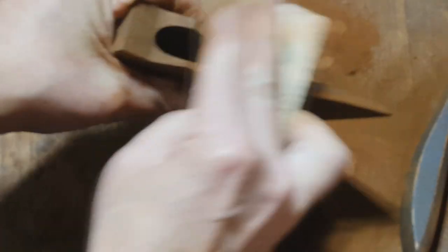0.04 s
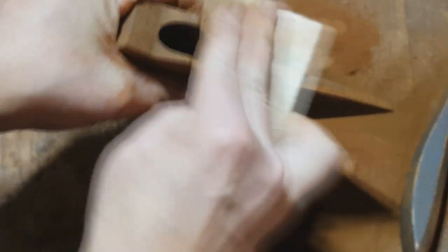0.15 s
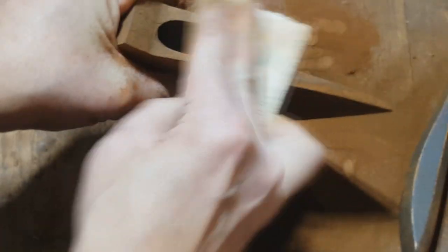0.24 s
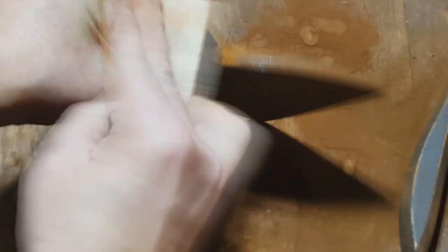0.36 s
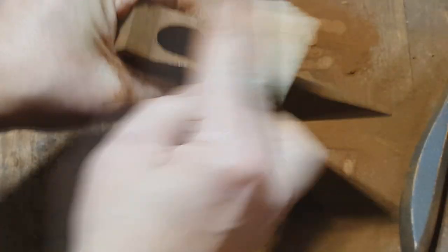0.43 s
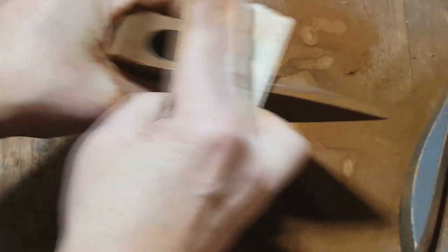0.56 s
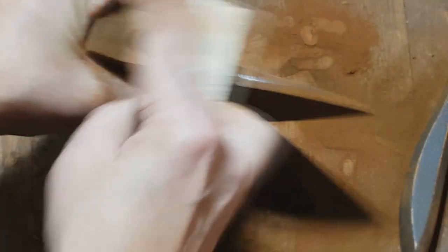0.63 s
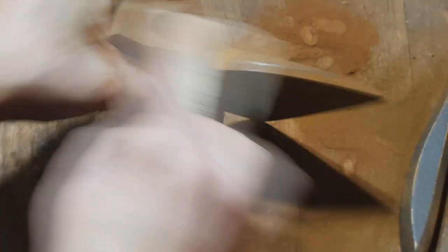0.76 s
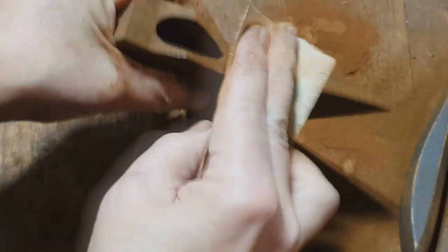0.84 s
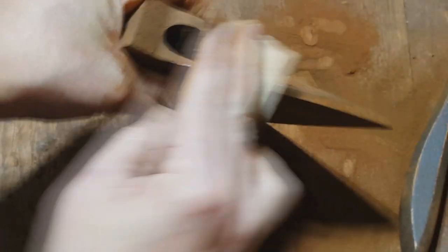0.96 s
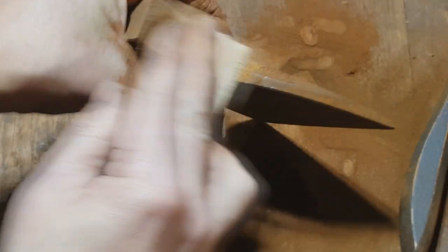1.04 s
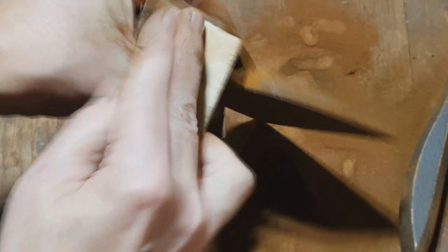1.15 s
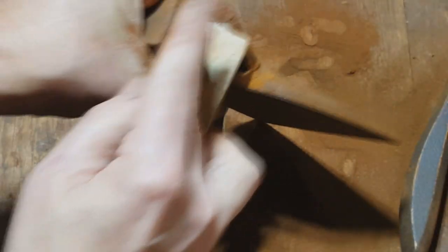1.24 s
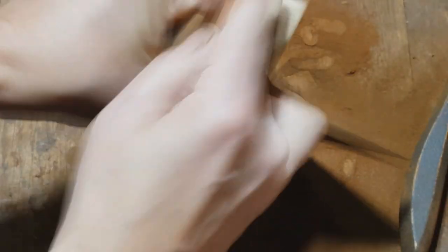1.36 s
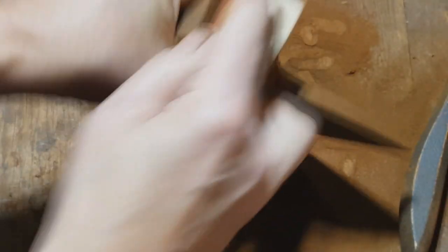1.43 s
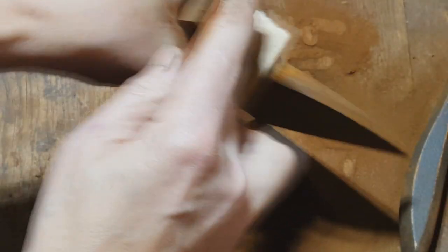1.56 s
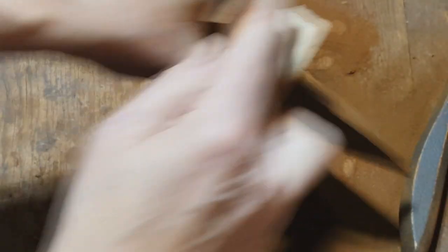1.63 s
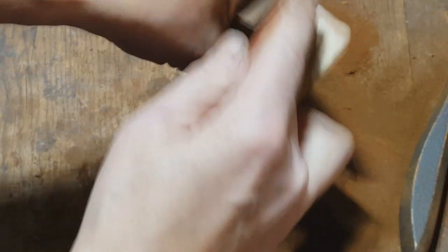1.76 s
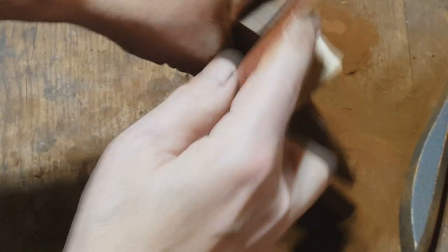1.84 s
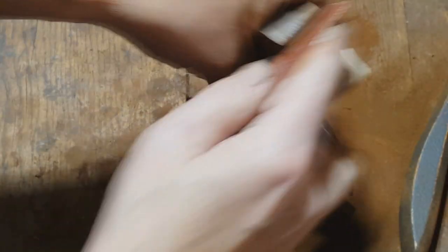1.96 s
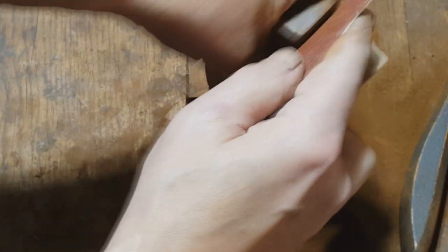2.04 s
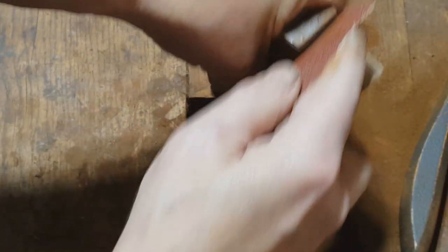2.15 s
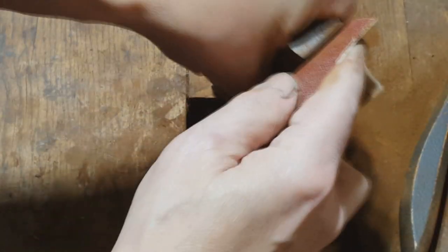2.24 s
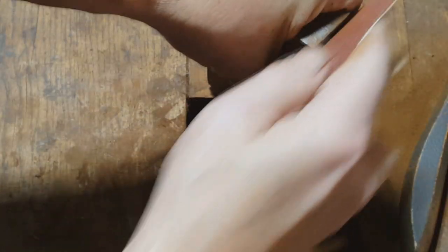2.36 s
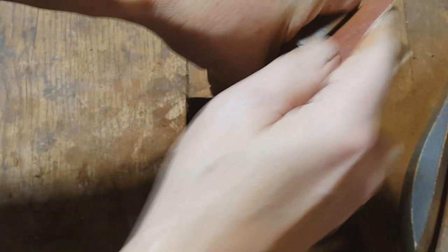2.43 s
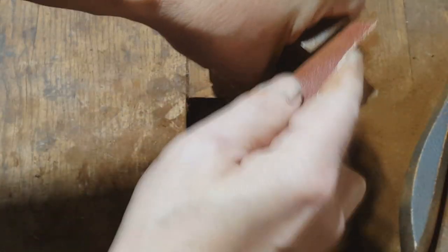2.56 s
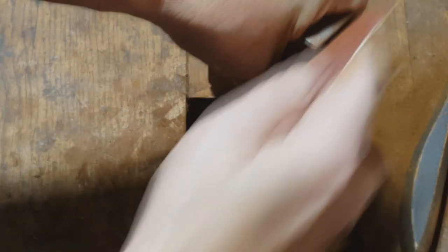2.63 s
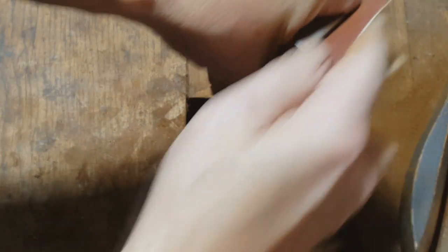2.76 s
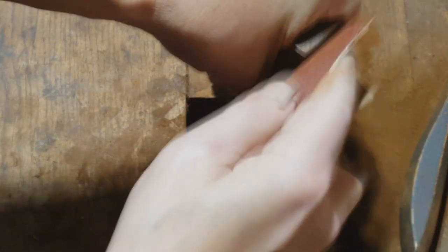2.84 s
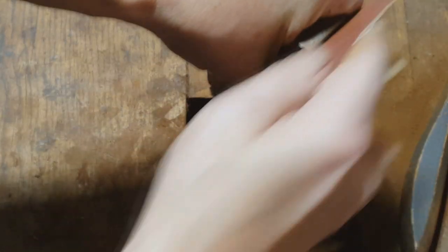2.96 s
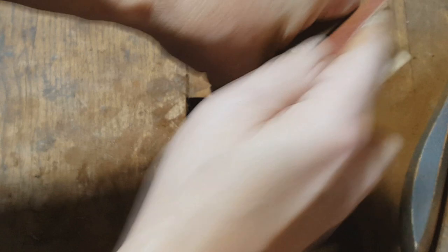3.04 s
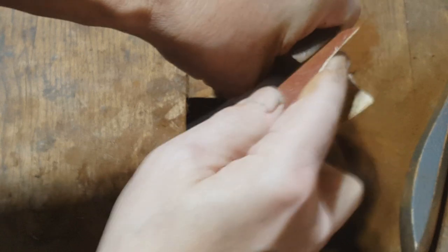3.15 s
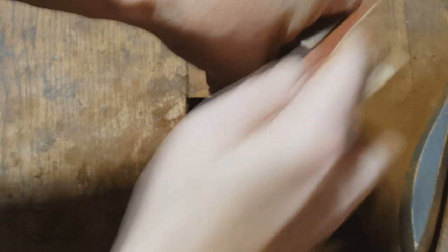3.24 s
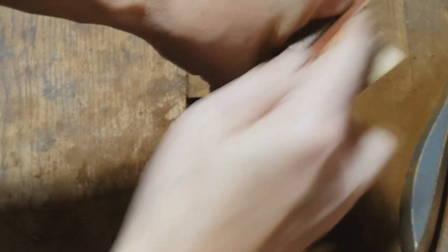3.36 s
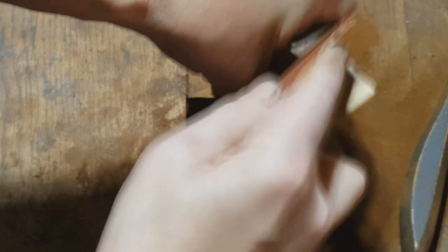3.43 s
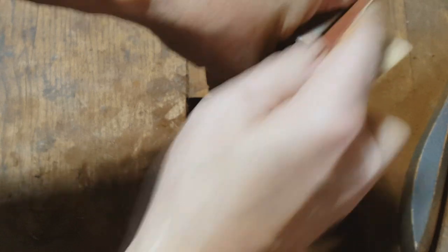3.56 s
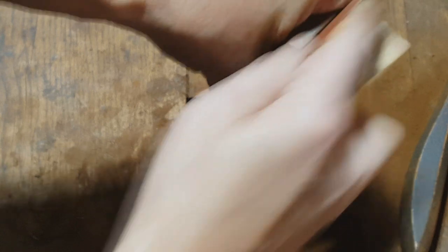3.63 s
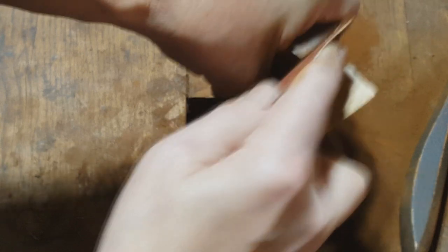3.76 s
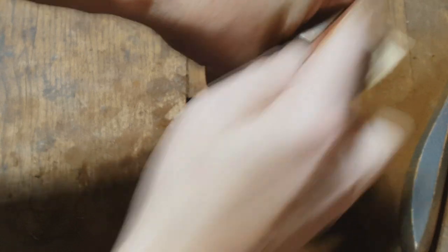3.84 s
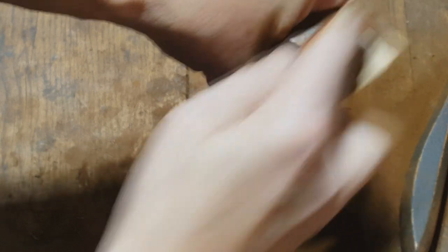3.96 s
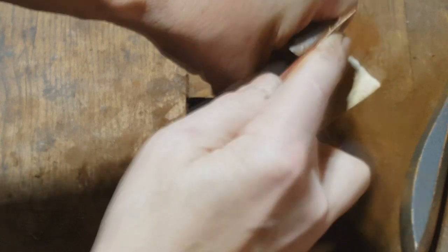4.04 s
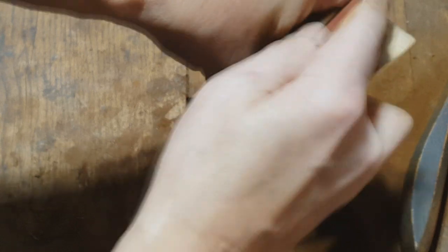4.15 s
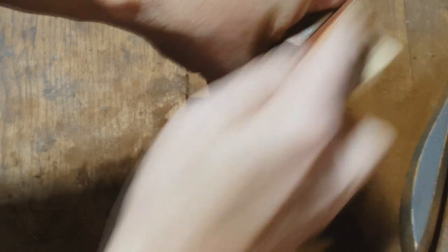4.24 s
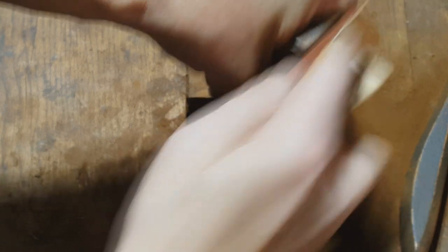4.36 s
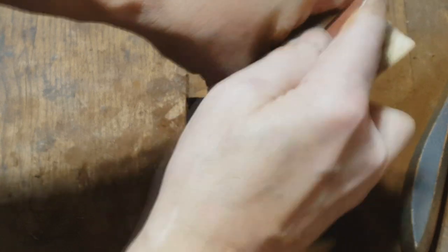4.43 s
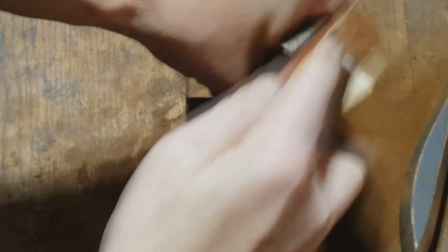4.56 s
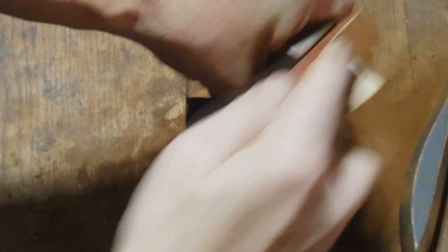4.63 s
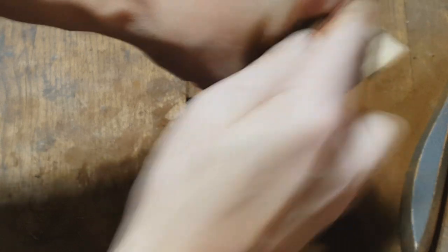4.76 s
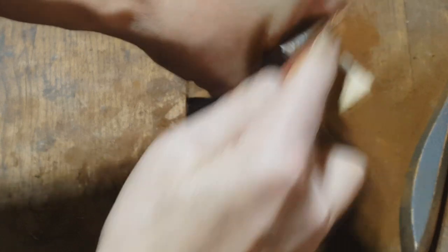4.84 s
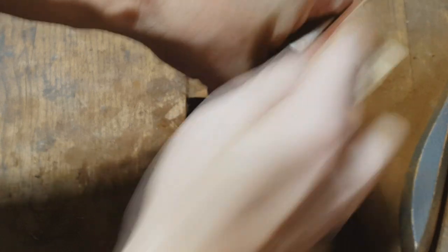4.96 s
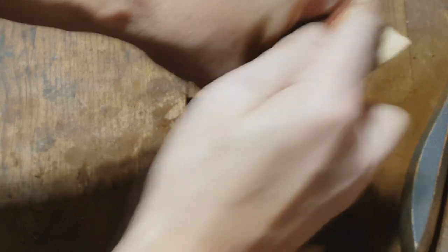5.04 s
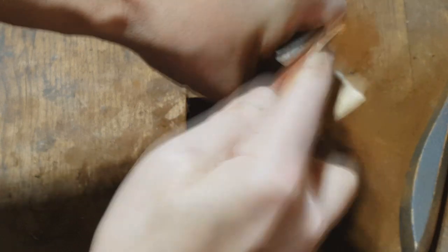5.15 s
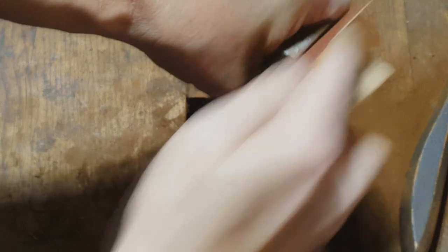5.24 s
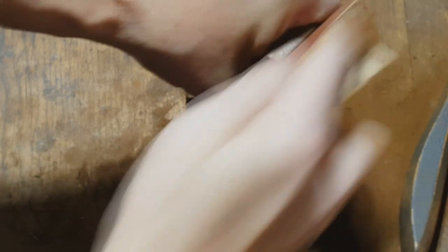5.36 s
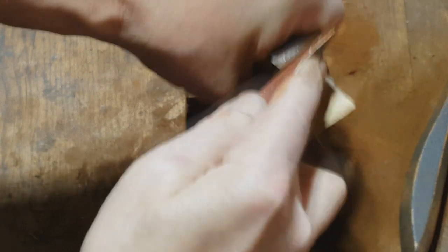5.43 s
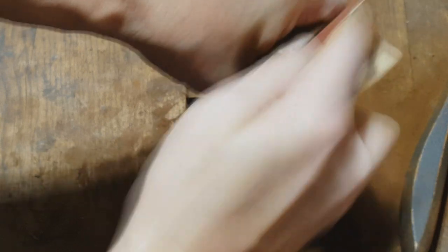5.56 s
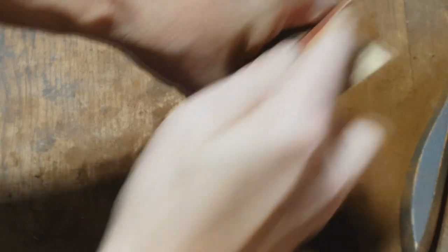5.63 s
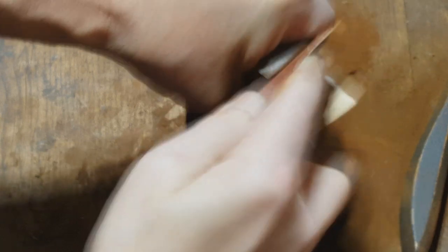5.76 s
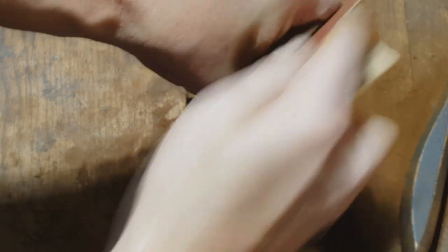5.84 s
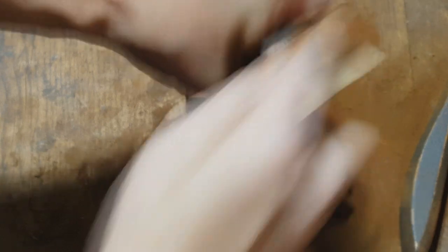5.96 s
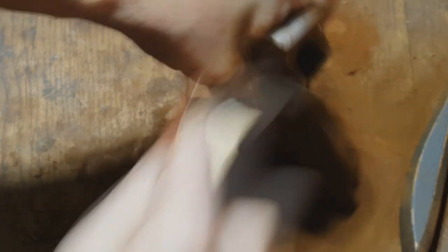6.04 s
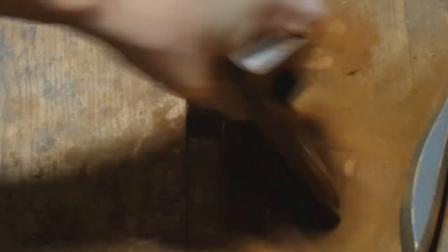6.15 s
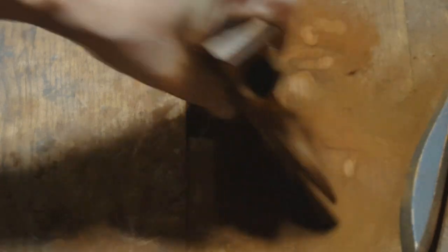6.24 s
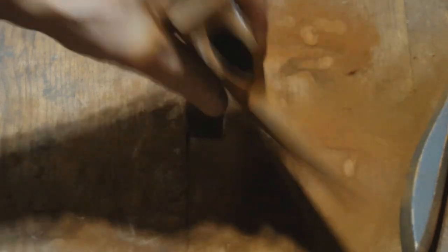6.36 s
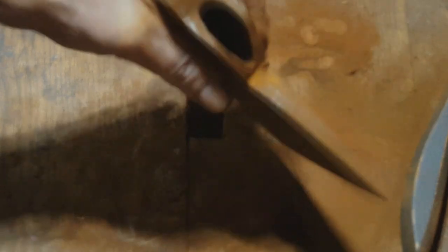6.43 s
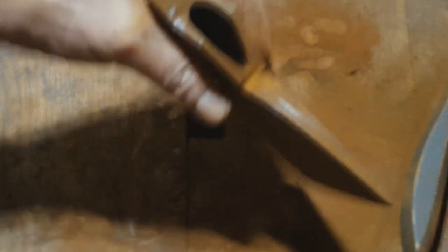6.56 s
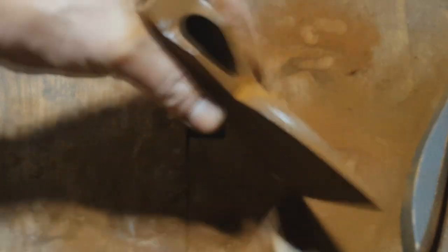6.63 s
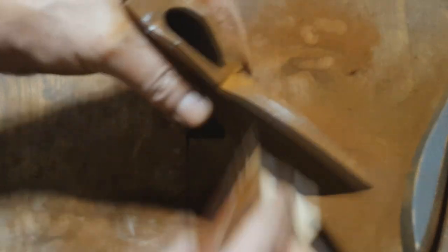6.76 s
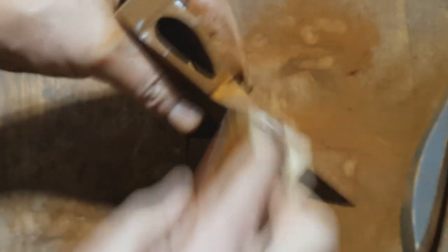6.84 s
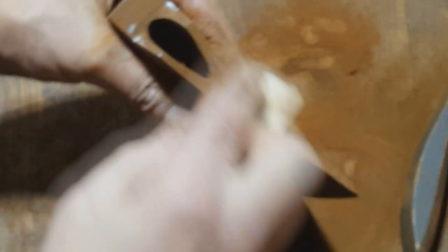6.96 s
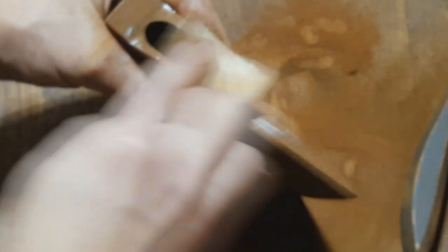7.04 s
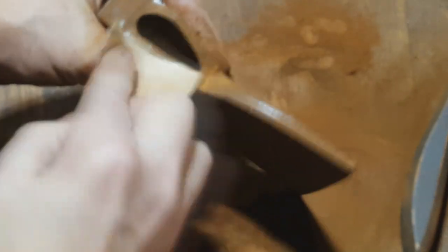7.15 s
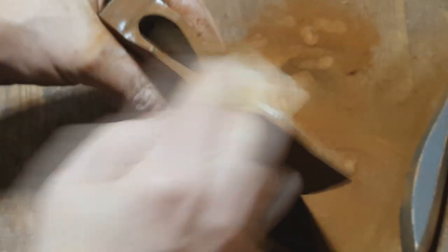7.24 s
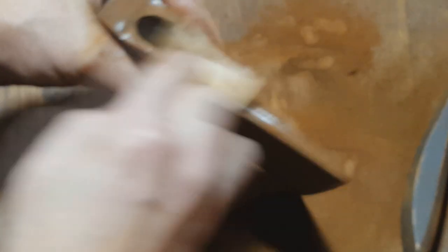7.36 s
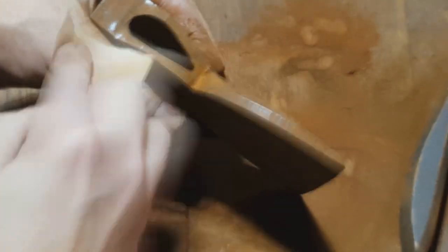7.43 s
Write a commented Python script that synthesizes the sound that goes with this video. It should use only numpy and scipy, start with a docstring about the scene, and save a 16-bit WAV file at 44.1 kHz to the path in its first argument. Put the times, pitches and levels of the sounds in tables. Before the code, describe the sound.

Close-up in a small workshop: a few uneven sandpaper scuffs and hollow clacks on a steel hatchet head, a fainter lull, then a steady fast run of coarse back-and-forth rasps. It ends with a sharp clack, near silence, the head thudding onto the wooden bench with a faint metallic ring, then short bright scuffs.

```python
"""In a small workshop, a sanding block is pushed back and forth over a rusty hatchet head on a wooden bench.
Grit noise scrapes through the modes of block, steel and paper, louder and brighter as the hand speeds up.
The block clacks on the head with short damped rings; slides and thuds shake the bench through its low modes.
A finger slides off the blade, which rings faintly as sines that die away, and rings again as it is set down.
Close walls answer with a decaying noise tail, over still air, a wavering low drone and a faint hum."""
import sys
import numpy as np
from scipy import signal
from scipy.fft import rfft, irfft, next_fast_len
from scipy.io import wavfile
from scipy.ndimage import uniform_filter1d, map_coordinates

SR = 44100
rng = np.random.default_rng(int(sys.argv[2]) if len(sys.argv) > 2 else 0)


def log_audio(samples):
    """Write samples as a 16-bit WAV file to the path given in sys.argv[1]."""
    # one column per channel
    frames = np.atleast_2d(samples).T
    # limit to full scale, then quantise
    limited = np.clip(frames, -1, 1)
    pcm = np.round(limited * 32767).astype(np.int16)
    wavfile.write(sys.argv[1], SR, pcm)


N = 330309  # length in samples

# Single strokes and light scuffs around the steady run: start_s, fastest_s, end_s, rasp_db
SINGLE_STROKES = [(-0.07, 0.089, 0.11, -23.5), (0.125, 0.157, 0.17, -26.5), (0.319, 0.37, 0.42, -33),
                  (0.353, 0.438, 0.5, -27.5), (0.658, 0.737, 0.82, -60.5), (0.889, 0.914, 1.002, -54),
                  (1.011, 1.097, 1.114, -27), (1.1, 1.221, 1.292, -32), (1.325, 1.404, 1.455, -45.5),
                  (1.464, 1.48, 1.53, -52), (1.496, 1.559, 1.617, -46.5), (1.651, 1.715, 1.772, -41.5),
                  (1.762, 1.809, 1.86, -60), (1.824, 1.954, 1.975, -49.5), (5.76, 5.939, 6.12, -72),
                  (6.343, 6.43, 6.49, -62.5), (6.619, 6.659, 6.45, -66.5), (6.737, 6.771, 6.85, -48),
                  (6.78, 6.847, 6.9, -34), (7.047, 7.063, 7.092, -32), (7.076, 7.126, 7.17, -35)]
# Steady run, one row per back-and-forth: push_start_s, pull_start_s, push_rasp_db, pull_rasp_db
RUN_CYCLES = [(2.032, 2.185, -36.5, -33.5), (2.344, 2.485, -33, -34.5), (2.636, 2.772, -32, -31.5),
              (2.936, 3.077, -30, -32.5), (3.229, 3.362, -30.5, -31.5), (3.524, 3.653, -28.5, -31),
              (3.81, 3.936, -28.5, -31), (4.08, 4.22, -29, -30.5), (4.366, 4.489, -29, -31),
              (4.643, 4.783, -28.5, -29), (4.936, 5.057, -28.5, -29.5), (5.213, 5.356, -29, -30.6),
              (5.506, 5.642, -29.5, -27)]
# Colour of each way of holding the work: from_s, then relative to the rasp hollow_block_db, loose_head_db,
# fizz_db (of a firm stroke), paper_db; then paper_resonance_hz, extra_low_rub_db
HOLDS = [(0, -4.5, -20.5, -9, -11.5, 5400, 0), (.3, -0.5, -13.5, -8.5, -7, 5300, -3.5),
         (.6, 1, -20, -5, -5, 3940, 2), (1.0, -1, -13, -6.5, -7.5, 3804, 1.5),
         (1.3, -4, -26, -3, -2, 3860, 8), (1.45, -1, -36, -6, -7.5, 1855, 2.5),
         (2.0, 2.5, -19.5, -4.5, -8.5, 2454, 1), (2.75, 0.6, -25.5, -6, -11, 3305, 0),
         (5.85, 5.5, -26, -9, -7, 1870, -4), (6.3, 1, -9, -5.5, -7, 7540, 0),
         (6.7, 1, -14, -2.5, 1, 2352, -9), (7.0, -6, -11, -4, 3.5, 3050, -1),
         (7.1, -3.5, -14, -0.5, 3, 2380, -18)]
# Broad hiss of paper on steel: frequency_hz, relative_density_db_per_hz
GRIT_COLOUR = [(150, -14), (330, -14), (600, -14), (780, -17.5), (1070, -17), (1590, -3), (2300, -10),
               (3500, -10), (5300, -13), (7500, -16.5), (10500, -20), (12800, -19), (15800, -26)]
# Modes of the block on the head: frequency_hz, width_hz, relative_level_db
BLOCK_MODES = [(1460, 150, -4), (1506, 320, 0.5), (1610, 220, 5), (1825, 90, -1.5), (1950, 180, -13)]
# Modes of the hand-damped head: frequency_hz, width_hz, level_over_hiss_db
HEAD_MODES = [(1954, 12, -5.5), (2142, 24, -7.5), (2600, 40, -6), (2890, 25, -5.5), (3170, 20, -2.5),
              (3460, 21, -8.5), (3600, 13, -3), (3790, 29, -9), (4890, 17, -9), (5450, 13, -11.5)]
# Modes of the head lying loosely on the bench: frequency_hz, width_hz, relative_level_db
LOOSE_HEAD_MODES = [(650, 160, -11), (811, 43, 0.5), (936, 17, 1), (1060, 160, -8.5)]
# The block meets the head: time_s, level_db, relative_low_knock_db, relative_bright_tick_db
CLACKS = [(.075, -12, -10, 0), (.083, -15.5, -9, -2), (0.158, -26.5, -7.5, 0), (0.2663, -7, -4.5, -16),
          (0.2728, -14.5, -7, -11), (0.469, -12.5, -12, -7), (.73, -36, -13, -5), (1.091, -12, -9, -5.5),
          (1.351, -33, 0.5, 3.5), (1.482, -36, -18.5, -4.5), (1.671, -33, -4, -2.5),
          (5.7457, -7.5, -7.5, 0), (6.528, -55, 0, 14), (6.64, -45.5, 4, -9.5), (6.751, -26.5, 7, 0),
          (7.051, -23, 8.5, -2), (7.070, -23.5, -10, -0.5), (7.151, -20, -14, 2)]
# Modes of block and head in a clack: frequency_hz, width_hz, relative_level_db
CLACK_MODES = [(940, 98, -14.5), (1410, 470, -6), (1600, 110, 0.5), (1620, 70, -4.5), (2150, 90, -12),
               (3310, 210, -7), (4210, 230, -13.5)]
# The hatchet is set down on the bench and rocks: time_s, peak_db
THUDS = [(6.3656, -17), (6.3744, -24), (6.383, -38), (6.391, -26), (6.402, -24), (6.421, -46)]
# The hatchet slides and shudders on the bench: start_s, length_s, level_db, shudder_pitch_hz
SLIDES = [(0.256, .24, -49.5, 214), (1.405, .1, -49, 149), (1.519, 0.067, -43.5, 128.7),
          (3.199, 2.97, -60, 105.2), (6.015, 0.058, -54, 140)]
# Modes of the bench top: frequency_hz, width_hz, relative_level_db
BENCH_MODES = [(72, 25, -17), (134, 34, -1), (170, 40, -6), (225, 50, -10), (285, 50, -7), (336, 45, 0),
               (440, 70, -16)]
# Ringing partials of the free blade: pitch_hz, relative_level_db, t60_s
BLADE_PARTIALS = [(2396, 0, .17), (2878, 1, .18), (4340, -8, .11), (5771, -1, .19), (6520, -8, .12),
                  (6950, -14, .2), (8629, -15, .3), (10080, -10, .17)]
# Decay of the workshop's answer: frequency_hz, t60_s
WORKSHOP_DECAY = [(150, 0.25), (700, 0.25), (1600, 0.18), (3200, 0.26), (6000, 0.18), (12000, 0.2)]
# Level of the low drone: time_s, rms_level_db
DRONE_LEVEL = [(0, -65.5), (.8, -70), (1.25, -63.5), (2.2, -58.5), (2.8, -66.5), (3.85, -63), (4.3, -74),
               (7.49, -74.5)]
# Spectrum of the quiet air: frequency_hz, relative_density_db_per_hz
AIR_COLOUR = [(25, -18.5), (60, -14.5), (120, -14), (190, -16), (400, -24), (1040, -34.5), (1820, -35),
              (2520, -42), (15800, -50.5)]
# Stereo likeness: frequency_hz, left_right_correlation (0 to 1)
STEREO_LIKENESS = [(100, 0.95), (500, 0.71), (1500, 0.72), (2800, 0.5), (5500, 0.53), (9000, 0.28),
                   (14000, .05)]
# Stereo balance: frequency_hz, left_minus_right_db
STEREO_LEAN = [(60, -2), (110, 0.5), (200, 1.5), (380, 2.0), (700, 3.5), (1290, 2), (2380, 3), (4400, -0.5),
               (8120, 2), (15000, -4)]

RUN_END_S = 5.81
PUSH_PEAK, PULL_PEAK = 0.71, 0.4266  # share of the stroke that has passed when the hand is fastest
PUSH_SHAPE, PULL_SHAPE = 1.007, 0.67  # power on the speed: a pull keeps a more even pace
FAR_REST_S, NEAR_REST_S = 0.017, 0.03  # the hand stops before it turns
FIRM_DB = -29  # rasp of an ordinary firm stroke
RUB_DB = -46.5  # low rub of a firm stroke, before the hold's own extra
RUB_GROWS, FIZZ_GROWS = 0.4, 0.98  # dB gained per dB of rasp


def sanding(block_power=1.46, rasp_power=2.34, fizz_power=2.68, rub_power=0.77, paper_scatter=0.07):
    """Grit drives block, head and paper; each layer follows a power of hand speed, the fizz growing fastest."""
    drive, paper = np.zeros((5, N)), np.zeros((2, N))
    powers = np.array([block_power, rasp_power, rasp_power, fizz_power, rub_power])[:, None]
    for t, speed, fastest, db in all_strokes():
        block_db, loose_db, fizz_db, paper_db, paper_hz, extra_rub_db = hold_at(fastest)
        press_db = db - FIRM_DB  # a light stroke keeps more of its rub and fizz
        fizz_level = FIRM_DB + fizz_db + FIZZ_GROWS * press_db
        rub_level = extra_rub_db + min(RUB_DB + RUB_GROWS * press_db, db - 7.5)
        levels = [db + block_db, db, db + loose_db, fizz_level, rub_level]
        drive[:, t] += amp(levels)[:, None] * speed ** powers
        centre_hz = paper_hz * np.exp(paper_scatter * rng.standard_normal())
        paper[:, t] += amp(db + paper_db) * speed ** rasp_power * paper_tone(speed, centre_hz)

    fine = grit(grain_db=2.0, chatter_db=-0.32, chatter_rate=300)
    fine = hand_echo(fine, delay=0.000508, swing=0.3, share=0.36)
    fine = patchy(fine, depth_db=1.55)
    fine = fine * amp(0.49 * wobble(60))  # the hand presses unevenly
    coarse = grit(grain_db=2, chatter_db=0.74, chatter_rate=220)

    hollow = filtered(coarse, lambda f: resonances(BLOCK_MODES, f) * band(f, 1220, 2200))
    block = unit(gliding(hollow, swing=0.001812))
    rasp = steel_band(fine, low_hz=2270, high_hz=5900)
    loose_head = unit(filtered(coarse, lambda f: resonances(LOOSE_HEAD_MODES, f) * band(f, 500, 1500)))
    fizz = steel_band(fine, low_hz=6800, high_hz=19000)
    rub = steel_band(coarse, low_hz=282, high_hz=1110)
    trims = amp([0, 1.77, 2.3, 2.5, -0.5])[:, None, None]  # same order as the layers
    layers = trims * np.array([block, rasp, loose_head, fizz, rub])
    return np.sum(drive[:, None] * layers, axis=0) + amp(3.5) * spread(paper)


def all_strokes():
    """(samples, hand speed, fastest s, dB) of every stroke; in the run a push peaks late and a pull early."""
    rows = []
    for start, fastest, end, db in SINGLE_STROKES:
        rows.append((*hand_speed(start, fastest, end), fastest, db))
    next_pushes = [row[0] for row in RUN_CYCLES[1:]] + [RUN_END_S]
    for (push, pull, push_db, pull_db), next_push in zip(RUN_CYCLES, next_pushes):
        there = (push, pull - FAR_REST_S, PUSH_PEAK, PUSH_SHAPE, push_db)
        back = (pull, next_push - NEAR_REST_S, PULL_PEAK, PULL_SHAPE, pull_db)
        for start, end, peak, shape, db in (there, back):
            fastest = start + peak * (end - start)
            t, speed = hand_speed(start, fastest, end)
            rows.append((t, speed ** shape, fastest, db))
    return rows


def hand_speed(start, fastest, end, breakaway=0.763):
    """Static friction holds the paper until it jerks loose; it speeds up, then slows to the end of the stroke."""
    t = np.arange(max(int(start * SR), 0), min(int(end * SR), N))
    progress = np.interp(t / SR, [start, fastest, end], [0, 0.5, 1])
    speed = np.abs(np.sin(np.pi * progress))
    sliding = np.interp(speed, [0.2, 0.28], [0.42, 1])  # the jerk as the paper lets go
    return t, np.where(t < fastest * SR, sliding * speed ** breakaway, speed)


def hold_at(s):
    """The colour of the hold in use at a moment."""
    return [colour for since, *colour in HOLDS if since <= s][-1]


def grit(grain_db, chatter_db, chatter_rate):
    """Countless grains catch and let go, in clumps as the paper chatters: noise with a jittering level."""
    catches = amp(grain_db * wobble(2500) + chatter_db * wobble(chatter_rate))
    return spread(rng.standard_normal((2, N)) * catches)


def hand_echo(x, delay, swing, share):
    """Sound bounces off the moving hand: a wandering short delay (in s) shifts the colour."""
    now = np.arange(N)
    bounced_from = now - SR * delay * np.exp(swing * wobble(7.6))
    return unit(np.array([ch + share * np.interp(bounced_from, now, ch) for ch in x]))


def patchy(x, depth_db):
    """The paper crosses patches of rust and bare steel, so its colour changes inside a stroke."""
    z = signal.stft(x, nperseg=256)[2]
    field = rng.standard_normal(z.shape[1:])
    field = uniform_filter1d(field, size=8, axis=0)  # smooth over frequency
    field = uniform_filter1d(field, size=7, axis=1)  # smooth over time
    return signal.istft(z * amp(depth_db * unit(field)), nperseg=256)[1][:, :N]


def gliding(x, swing):
    """Changing finger pressure bends the resonances: time is warped back and forth by swing (in s)."""
    now = np.arange(N)
    warped = now + SR * swing * wobble(11)
    return np.array([np.interp(warped, now, ch) for ch in x])


def paper_tone(speed, centre_hz, width=0.083, bend=0.139):
    """The pressed sheet has a broad resonance, narrow noise on a carrier that rises a little with speed."""
    pitch = centre_hz * (1 + bend * (speed - speed.mean()))
    phase = 2 * np.pi * np.cumsum(pitch) / SR
    noise = rng.standard_normal((2, 2, len(speed)))
    a, b = filtered(noise, lambda f: 1 / (1 + (f / (2 * width * centre_hz)) ** 2))
    return unit(a * np.cos(phase) + b * np.sin(phase))


def steel_colour(f):
    """The broad hiss of paper on steel, with the head's damped modes standing out of it."""
    return amp(along(GRIT_COLOUR, f)) * (1 + resonances(HEAD_MODES, f))


def steel_band(x, low_hz, high_hz):
    """One band of grit coloured by the steel, at rms 1."""
    return unit(filtered(x, lambda f: steel_colour(f) * band(f, low_hz, high_hz)))


def shifting(creep_db=-29, fade_s=0.044, touch_db=-70.5):
    """The paper creeps in small catches that lag the strokes and die away; resting fingers rustle faintly."""
    keep = np.exp(-1 / (fade_s * SR))
    lingering = signal.lfilter([1 - keep], [1, -keep], friction())
    creep = grit(grain_db=2.5, chatter_db=2.5, chatter_rate=130)
    return (amp(touch_db) + amp(creep_db) * lingering) * steel_band(creep, low_hz=200, high_hz=18000)


def friction():
    """The force of the paper on the head: stroke strength times hand speed."""
    force = np.zeros(N)
    for t, speed, _, db in all_strokes():
        force[t] += amp(db) * speed
    return force


def clacks(tick_t60=0.016, knock_t60=0.017, contact_hz=3200):
    """The padded block lands: a short ring of block and head, a dull knock and a gritty tick."""
    out, t = np.zeros((2, N + SR)), np.arange(SR // 5) / SR
    contact = t * np.exp(-2 * np.pi * contact_hz * t)  # the paper cushions the blow
    ring = filtered(contact, lambda f: resonances(CLACK_MODES, f))
    ring /= np.abs(ring).max()
    for s, db, knock_db, tick_db in CLACKS:
        noise = rng.standard_normal((3, len(t)))
        knock = unit(filtered(noise[0], lambda f: band(f, 200, 1400))) * amp(-60 * t / knock_t60)
        tick = unit(filtered(noise[1:], lambda f: band(f, 1800, 15000) / np.sqrt(f + 1)))
        tick = tick * amp(-60 * t / tick_t60)
        clack = amp(-1.5) * ring + amp(knock_db - 11.5) * knock + amp(tick_db - 6.5) * tick
        first = round(s * SR)
        out[:, first:first + len(t)] += amp(db) * clack
    return out[:, :N]


def bench(soft_hz=490, shudder_spread=1.5):
    """Soft, heavy contacts ring the modes of the bench top; the sliding hatchet shudders as low band noise."""
    t = np.arange(SR // 3) / SR
    contact = t * t * np.exp(-2 * np.pi * soft_hz * t)
    boom = filtered(contact, lambda f: resonances(BENCH_MODES, f))
    blows = np.zeros(N)
    for s, db in THUDS:
        blows[round(s * SR)] = amp(db)
    sliding = np.zeros(N)
    for start, length, db, hz in SLIDES:
        noise = rng.standard_normal(N)
        shudder = unit(filtered(noise, lambda f: band(f, hz / shudder_spread, hz * shudder_spread)))
        sliding += amp(db) * swell(start, length) * shudder
    return signal.fftconvolve(blows, boom / np.abs(boom).max())[:N] + sliding


def blade(brush_db=-53, landing_db=-23, sing_db=-2.5, rub_db=19):
    """The free blade sings for a moment when a finger rubs off it, and again as it is set down."""
    rubbing = unit(rng.standard_normal(N) * amp(2.5 * wobble(150)))
    brush = amp(brush_db) * swell(start=6.008, length=0.069) * rubbing
    touchdown = np.arange(N) == round(THUDS[0][0] * SR)
    landing = filtered(amp(landing_db) * touchdown, lambda f: band(f, 2800, 10500))
    t = np.arange(SR // 3) / SR
    ring = sum(amp(db - 60 * t / t60) * np.sin(2 * np.pi * hz * t) for hz, db, t60 in BLADE_PARTIALS)
    sing = signal.fftconvolve(amp(sing_db) * brush + landing, ring / np.linalg.norm(ring))[:N]
    return sing + amp(rub_db) * filtered(brush, lambda f: band(f, 230, 570))


def swell(start, length):
    """A contact that builds up and lets go: half a sine, times in s."""
    return np.sin(np.pi * np.clip((np.arange(N) / SR - start) / length, 0, 1))


def workshop(x):
    """Near walls answer: a noise tail with its own decay time at each frequency."""
    hz, t, z = signal.stft(rng.standard_normal((2, SR // 2)), SR, nperseg=256)
    decay = amp(-60 * t / along(WORKSHOP_DECAY, hz)[:, None])
    tail = spread(signal.istft(z * decay, SR, nperseg=256)[1])
    tail = np.pad(tail / np.linalg.norm(tail[0]), ((0, 0), (130, 0)))  # starts 130 samples late
    return signal.fftconvolve(x, tail, axes=1)[:, :N]


def background(air_db=-62.5, hum_db=-71, drone_hz=52.0, hum_hz=130):
    """Still air as coloured noise, with a low drone and a faint hum as sines of wavering phase."""
    air = filtered(spread(rng.standard_normal((2, N))), lambda f: amp(along(AIR_COLOUR, f)))
    drone = amp(curve(DRONE_LEVEL)) * wavering_tone(drone_hz, waver=1.1)
    hum = amp(hum_db) * wavering_tone(hum_hz, waver=1.3)
    return amp(air_db) * unit(air) + drone + hum


def wavering_tone(hz, waver):
    """A sine of rms 1 whose phase wanders by about waver radians."""
    return np.sqrt(2) * np.sin(2 * np.pi * hz * np.arange(N) / SR + waver * wobble(23.0))


def spread(pair):
    """Two unrelated signals become left and right: alike in the bass, apart in the treble."""
    def mid_side(f):
        turn = np.arccos(np.clip(along(STEREO_LIKENESS, f), -1, 1)) / 2
        return np.array([np.cos(turn), np.sin(turn)])
    mid, side = filtered(pair, mid_side)
    return np.array([mid + side, mid - side])


def resonances(modes, f):
    """Causal response of a body with (Hz, width Hz, dB) modes."""
    return sum(amp(db) * 1j * f * w / (hz * hz - f * f + 1j * f * w) for hz, w, db in modes)


def band(f, low_hz, high_hz):
    """A soft-edged pass band."""
    return 1 / np.sqrt((1 + (low_hz / (f + 1)) ** 10) * (1 + (f / high_hz) ** 10))


def filtered(x, response):
    """Filter x by a complex response of frequency, padded against wrap-around."""
    n = x.shape[-1]
    m = next_fast_len(n + 8192)
    return irfft(rfft(x, m) * response(np.fft.rfftfreq(m, 1 / SR)), m)[..., :n]


def wobble(rate):
    """A smooth random curve, rate knots a second."""
    knots = rng.standard_normal(int(N * rate / SR) + 4)
    return map_coordinates(knots, [np.arange(N) * rate / SR])


def curve(rows):
    """One value per sample from (s, value) rows."""
    return np.interp(np.arange(N) / SR, *np.transpose(rows))


def along(points, hz):
    """Read (Hz, value) points on a log axis."""
    f, v = np.transpose(points)
    return np.interp(np.log(hz + 1), np.log(f + 1), v)


def amp(db):
    """Decibels to gain."""
    return 10 ** (np.asarray(db) / 20)


def unit(x):
    """Scale to rms 1."""
    return x / np.sqrt(np.mean(x ** 2) + 1e-20)


def scene():
    """The work is heard close by, a little to the left at most frequencies, with the workshop around it."""
    near = sanding() + shifting() + clacks() + bench() + blade()
    heard = near + amp(-8.5) * workshop(near)
    leaning = filtered(heard, lambda f: amp(np.outer([0.5, -0.5], along(STEREO_LEAN, f))))
    return leaning + background()


def record(dry, top_hz=15900):
    """Nothing is kept above the band limit."""
    return filtered(dry, lambda f: f < top_hz)


dry = scene()
out = record(dry)
log_audio(out)
```